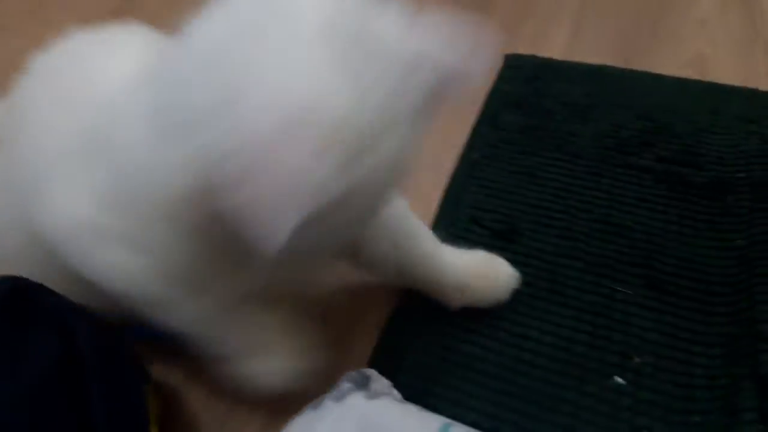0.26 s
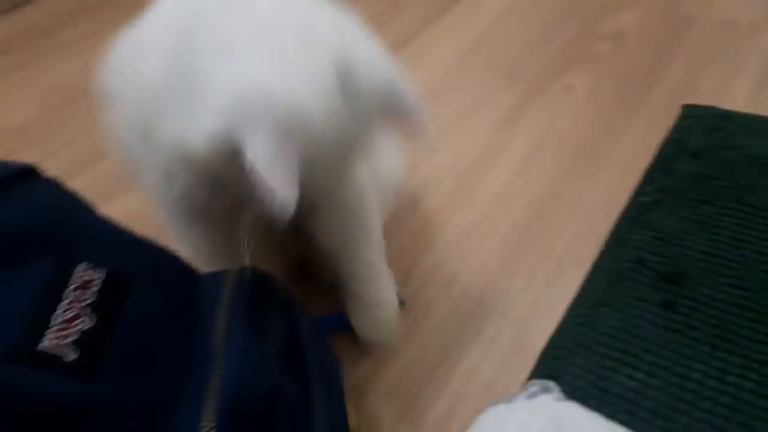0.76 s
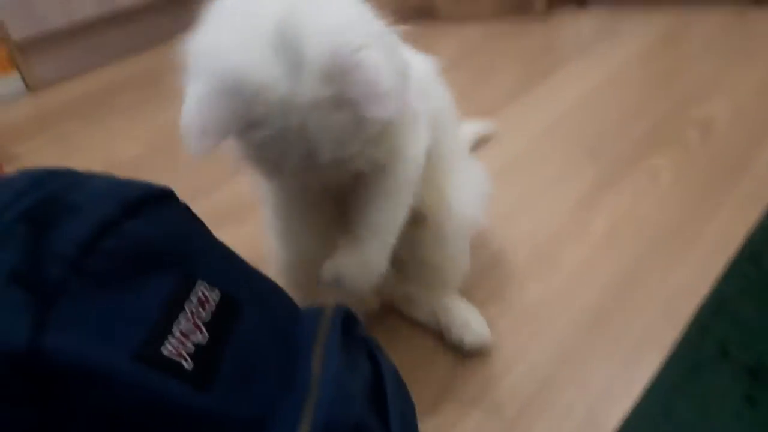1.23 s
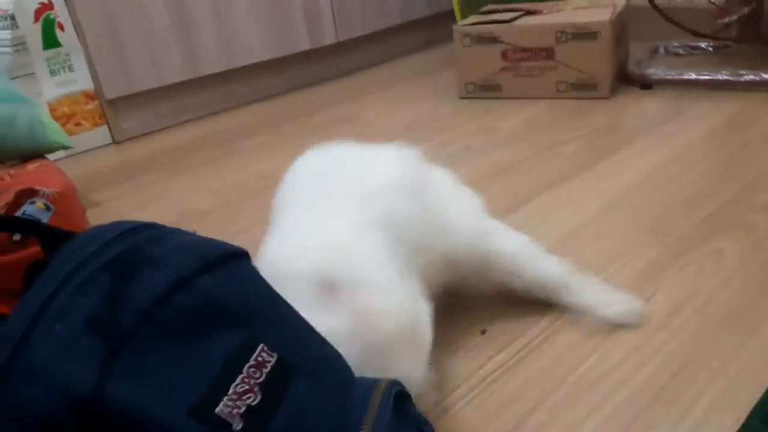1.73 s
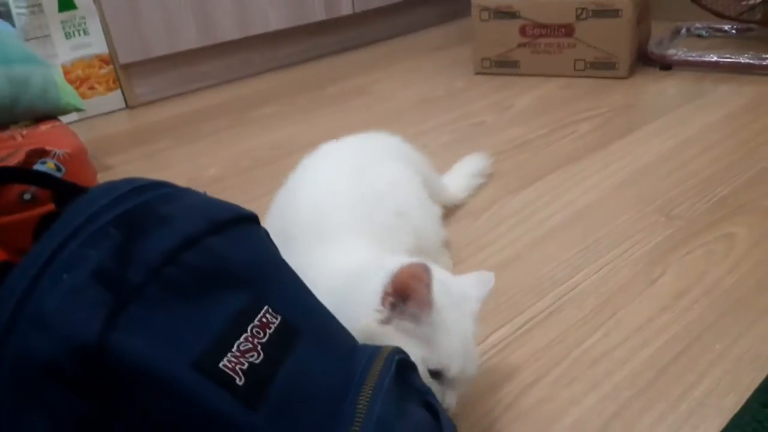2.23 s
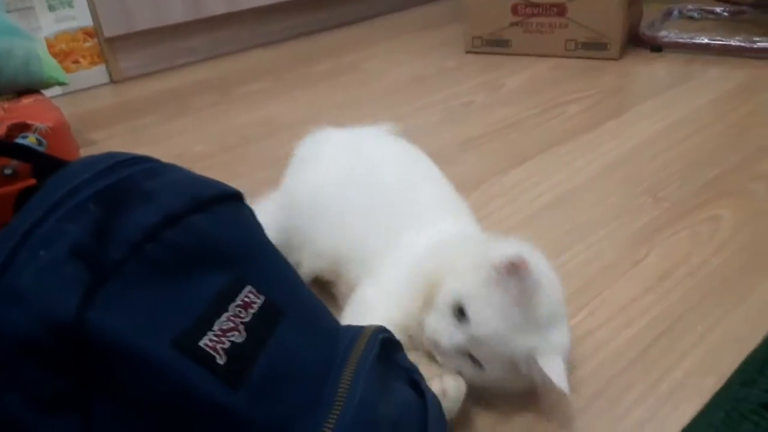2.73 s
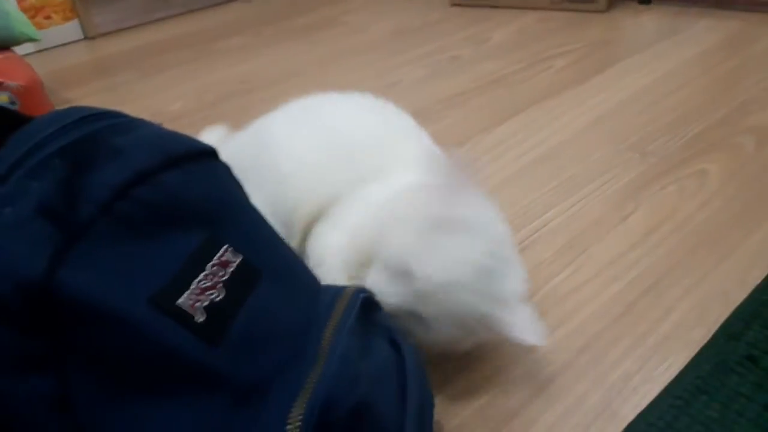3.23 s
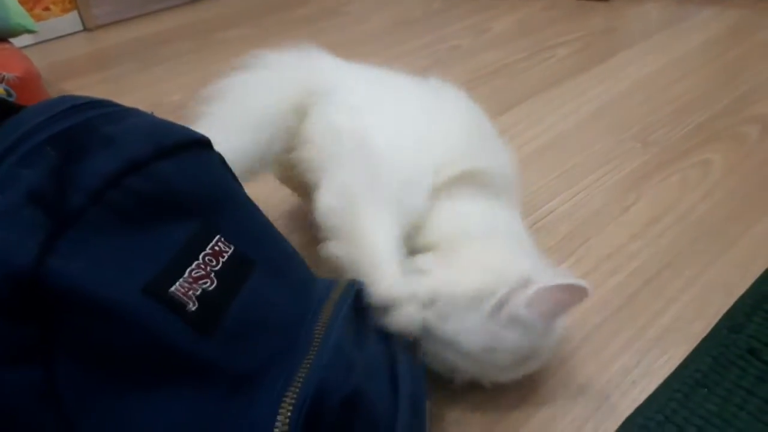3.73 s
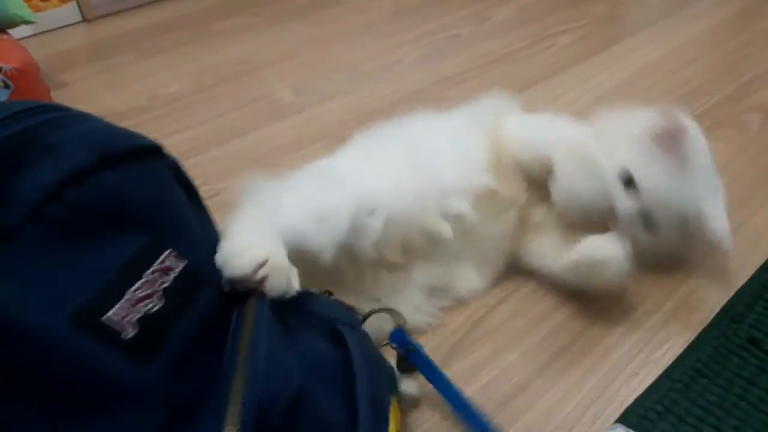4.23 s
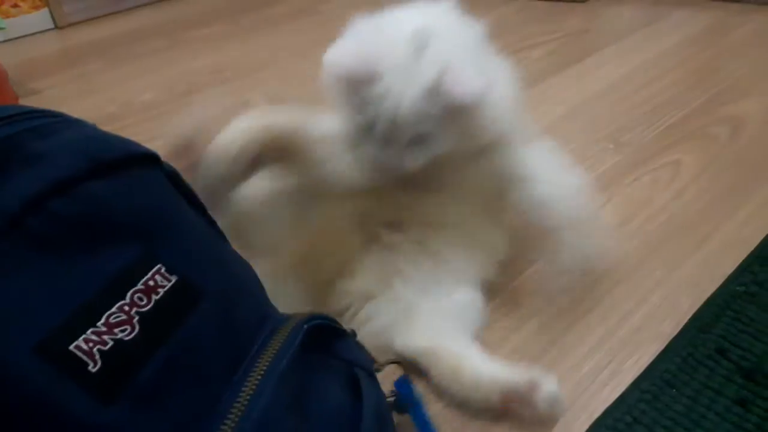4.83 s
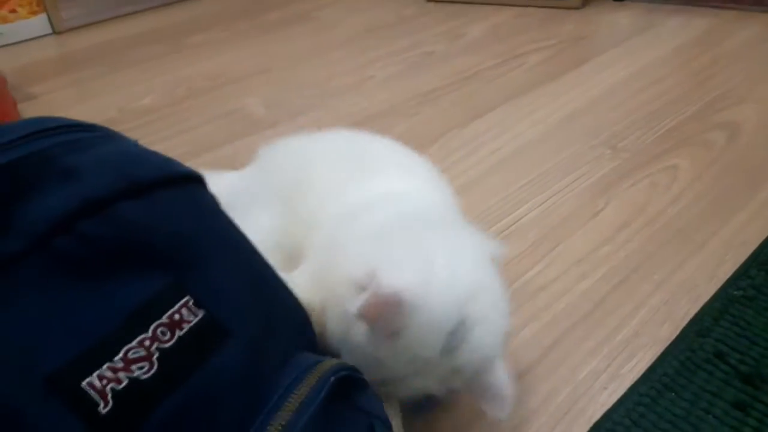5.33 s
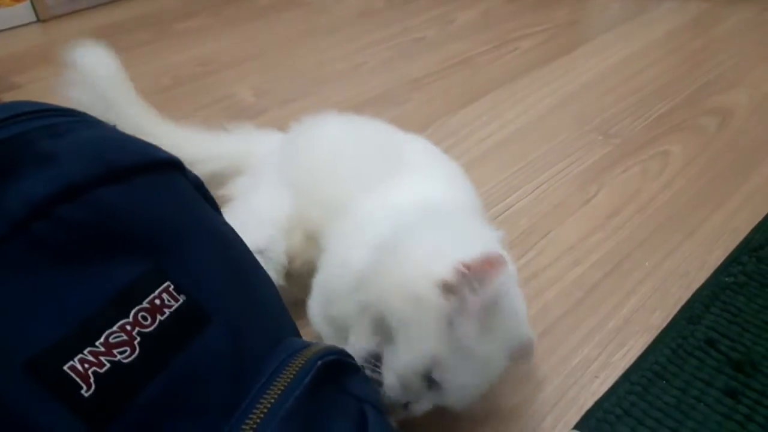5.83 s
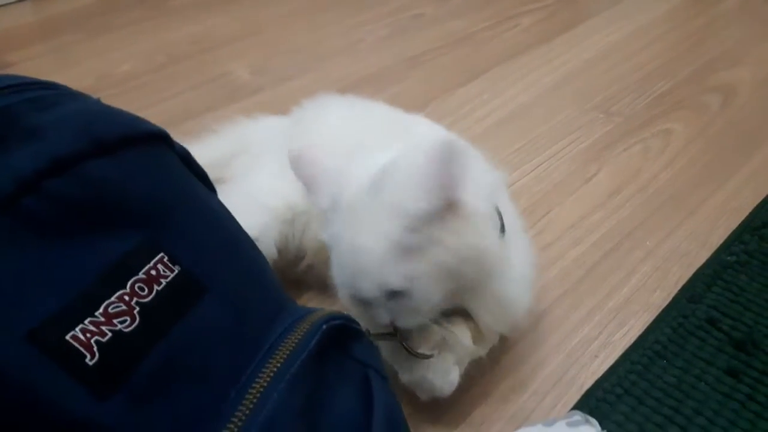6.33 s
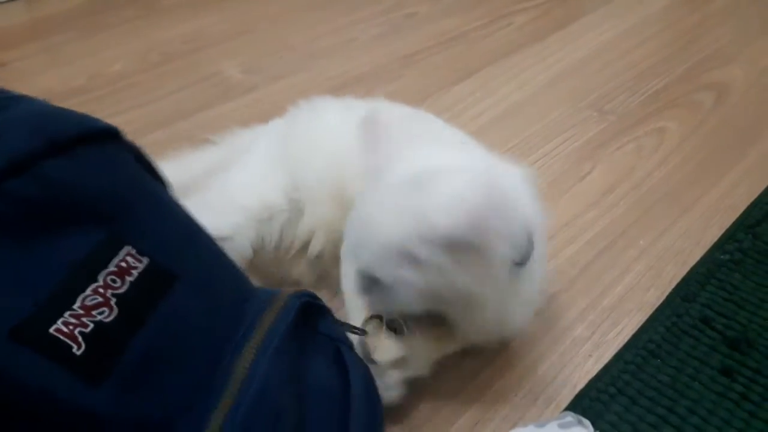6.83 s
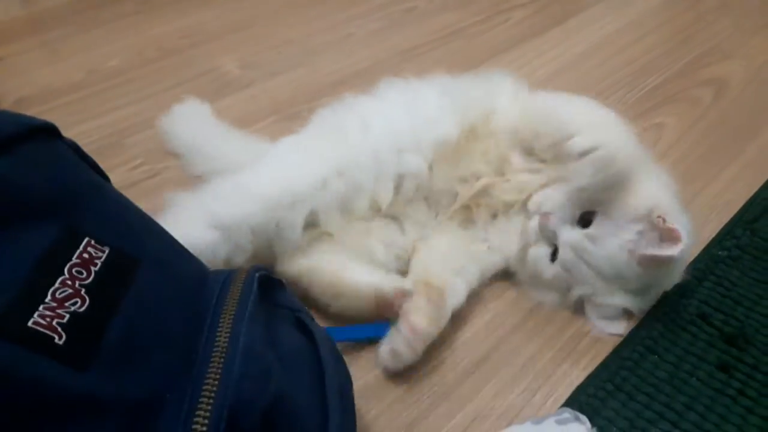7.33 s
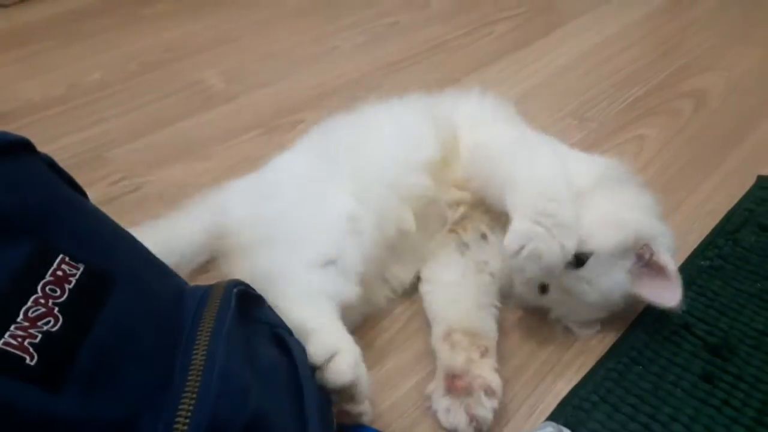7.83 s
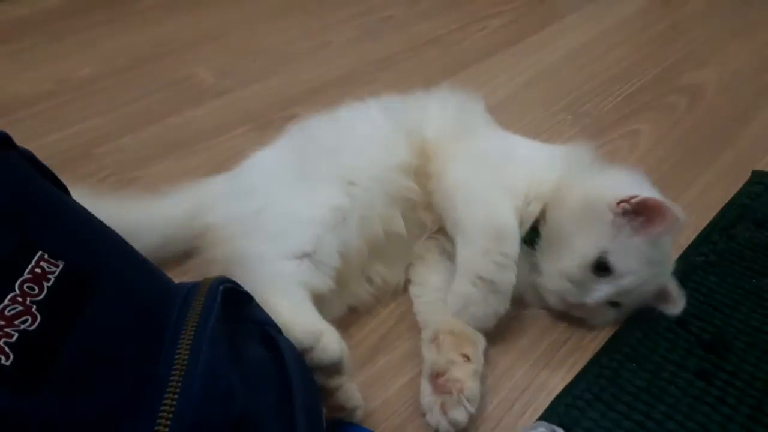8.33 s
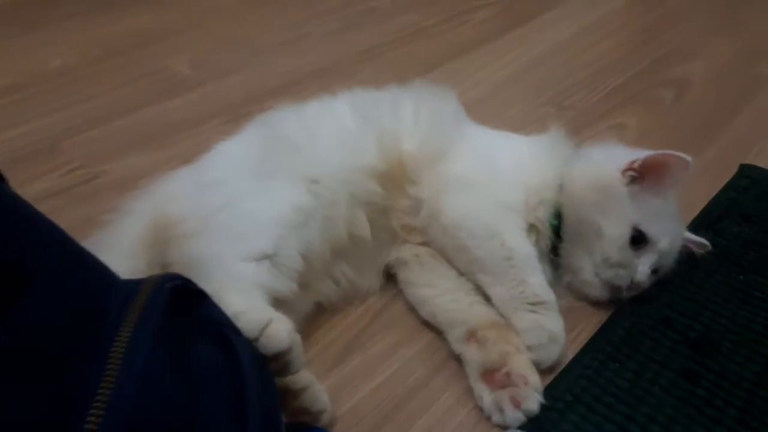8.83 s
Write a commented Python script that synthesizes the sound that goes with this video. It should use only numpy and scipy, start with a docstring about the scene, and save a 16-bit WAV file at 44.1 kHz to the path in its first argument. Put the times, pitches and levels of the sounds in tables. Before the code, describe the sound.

A kitten wrestles a bag strap on a laminate floor, heard close in a small live room. A tiny high collar bell jingles in bursts, with claw ticks, metal tag clinks and nylon rustle. A strap snaps, then a loud double knock hits the boards; later come brighter jingles, scuffs, bounces and thuds. A low appliance hum pulses gently throughout.

```python
"""Kitten wrestling a bag strap

A collar bell jingles in bursts as decaying modes and a zip tag clinks; small clicks of filtered noise give
claws ticking on nylon, muffled bell ticks and the bright edges of a knock. Paws thud and hard things knock
on a laminate floor: short board modes, with noise cracks for the knocks. Fur and nylon rustle as uneven noise
bands, with a room tail of sparse random taps, close to a small microphone.
An appliance hums in steady sines, its motor beating nearly three times a second against the mains tone."""
import sys
import numpy as np
from scipy import signal
from scipy.io import wavfile
from scipy.ndimage import uniform_filter1d

SR = 44100
rng = np.random.default_rng(int(sys.argv[2]) if len(sys.argv) > 2 else 0)


def field_ratio(decibels):
    """Amplitude ratio for a level in dB (20 dB per decade); scalars and array-likes work."""
    return 10 ** (np.asarray(decibels, dtype=float) / 20)


def waveform_to_disk(signal):
    """Save audio, clipped to [-1, 1], as 16-bit WAV at the path in sys.argv[1]."""
    frames = np.transpose(np.atleast_2d(signal))
    scaled = np.clip(frames, -1, 1) * 32767
    samples = np.round(scaled).astype(np.int16)
    wavfile.write(sys.argv[1], SR, samples)


N = 399987  # length in samples

# Ringing modes of the bell's shell. Each row: nominal frequency in Hz, relative level in dB, t60 in seconds.
BELL_MODES = [(4767, 2, 0.045), (4814, -3, 0.05), (6050, -15.5, 0.015), (11460, -3, 0.074),
              (11350, 0.5, 0.08)]
# Upper bell modes against the main ring as the bell turns. Each row: time in seconds, gain in dB.
UPPER_GAIN = [(.75, -9.5), (1.45, -2), (1.53, -5), (1.9, -12.5), (4.86, -1.5), (5.55, -14), (7.04, -2),
              (7.11, -10.5), (7.3, 3), (7.7, -4)]
UPPER_FROM_HZ = SR / 5


def evened(x):
    """Scales to rms 1."""
    return x / np.sqrt(np.mean(x ** 2) + 1e-20)


def read(points, hz):
    """Reads a curve over frequency on a log axis."""
    f, value = np.transpose(points)
    return np.interp(np.log(hz + 1), np.log(f + 1), value)


def add(mix, s, sound):
    """Adds a sound at time s, cut at the end of the mix."""
    part = mix[round(s * SR):][:len(sound)]
    part += sound[:len(part)]


def ring(hz, t60):
    """One mode: a sine that decays by 60 dB in t60 seconds."""
    t = np.arange(round(SR / 8)) / SR
    return field_ratio(-60 * t / t60) * np.sin(2 * np.pi * hz * t)


def band(x, lo_hz, hi_hz, order=2):
    """Causal band-pass."""
    edges = np.clip([lo_hz, hi_hz], 20, .45 * SR)
    return signal.sosfilt(signal.butter(order, edges, "bandpass", fs=SR, output="sos"), x)


def burst(colour, fall_s):
    """A short spit of noise through a minimum-phase filter of the given colour, peak 1."""
    spit = rng.standard_normal(1024) * np.exp(-np.arange(1024) / SR / fall_s)
    log_gain = np.log(field_ratio(read(colour, abs(np.fft.fftfreq(1024, 1 / SR)))))
    minimum_phase = np.exp(np.conj(signal.hilbert(log_gain)))
    out = np.fft.ifft(np.fft.fft(spit) * minimum_phase).real
    return out / abs(out).max()


def grains(per_s, spread_db):
    """Random clicks of either sign, a few of them large."""
    size = field_ratio(spread_db * np.minimum(rng.exponential(1, N), 4))
    present = rng.random(N) < per_s / SR
    return size * present * rng.choice([-1, 1], N)


def bell():
    """Each strike rings the shell's modes in its own mix and ticks; the loose pellet rebounds unevenly after it."""
    # Pellet strikes. Each row: time in seconds, level in dB.
    strikes = [(.725, -47), (.7334, -47), (.748, -44), (.7784, -54), (.798, -39.5), (.885, -50),
               (.9011, -46), (.9301, -45), (1.07, -43), (1.1027, -48), (1.1635, -36), (1.2603, -44),
               (1.2788, -36.5), (1.3696, -35.5), (1.4135, -43), (1.4654, -42), (1.4878, -42.5),
               (1.527, -44), (1.5681, -43), (1.5938, -38.5), (1.9084, -30), (2.5855, -44.5), (2.645, -40),
               (2.7916, -31), (3.3004, -42), (4.8431, -54), (4.859, -42), (5.0032, -40.5), (5.0798, -25.5),
               (5.297, -42), (5.3438, -33.5), (5.5482, -42), (5.7904, -37.5), (5.9253, -38), (5.95, -47),
               (5.993, -48), (6.2981, -47), (6.4615, -49), (7.0426, -33.5), (7.1074, -26), (7.2956, -41)]
    out = np.zeros(N)
    draws = rng.random((len(strikes), 4, 3 + len(BELL_MODES)))  # a strike and three rebounds
    for (s, db), hits in zip(strikes, draws):
        upper_db = np.interp(s, *np.transpose(UPPER_GAIN))
        for k, (wait, weak, muffle, *mix) in enumerate(hits):
            late = .009 * (k - .9 * wait) * (k > 0)  # seconds after the strike
            size_db = db - (k > 0) * (15 * weak + 170 * late)
            pull = 1 + .02 * (muffle - .5)  # fur and pellet pull the pitch about
            for (hz, mode_db, t60), share in zip(BELL_MODES, mix):
                tone_db = size_db - 4.5 + mode_db - 7.5 * share + upper_db * (hz > UPPER_FROM_HZ)
                add(out, s + late, field_ratio(tone_db) * ring(hz * pull, t60))
            spit = rng.standard_normal(512) * np.exp(-np.arange(512) / SR / 0.0011)
            add(out, s + late, field_ratio(size_db + 3.0) * band(spit, 4500, 6700, order=3))
    return out


def rattle():
    """The rolling pellet grazes the shell densely and unevenly; each spell swells and dies away."""
    # Spells of rolling round the shell. Each row: start in seconds, length in seconds, relative level in dB.
    rolls = [(1.82, .16, -52), (2.976, 0.56, -69.5), (4.1, 0.055, -58), (4.239, 0.056, -56.5),
             (4.377, 0.16, -63), (4.615, 0.24, -60.5), (4.83, 0.12, -57), (5.26, .08, -46.5),
             (5.551, 0.2, -53.5), (6.166, 0.097, -66), (6.977, 0.063, -56.5), (7.091, 0.093, -36.5),
             (7.2, 0.17, -62), (7.69, 0.036, -67), (7.847, 0.068, -57)]
    t = np.arange(N) / SR
    swell = np.zeros(N)
    for s, length, db in rolls:
        progress = np.clip((t - s) / length, 0, 1)
        swell += field_ratio(db) * np.sin(np.pi * progress ** 0.55)  # rises faster than it falls
    grazes = swell * evened(grains(300, 5.7))
    upper = field_ratio(np.interp(t, *np.transpose(UPPER_GAIN)))
    out = np.zeros(N)
    for hz, db, t60 in BELL_MODES:
        drive = grazes * (upper if hz > UPPER_FROM_HZ else 1)
        out += signal.oaconvolve(drive, field_ratio(db) * ring(hz, t60))[:N]
    return field_ratio(-24.5) * out


def broad_click(hz):
    """A very short broad click, humped around its own centre."""
    wide = 1 + hz / 9000  # low clicks are narrower
    hump = [(hz / wide ** 3, -35), (hz / wide, -10), (hz, 0), (hz * wide, -10), (hz * wide ** 3, -35)]
    return burst(hump, .0007)


def small_clicks(rustle):
    """Claw catches, muffled bell ticks and a knock's bright edges; random ones come louder with the rustle."""
    # Small clicks: claw catches, muffled bell ticks and the bright edges of a knock.
    # Each row: time in seconds, level in dB, centre in Hz.
    ticks = [(0.6542, -48, 5760), (.8722, -52, 5840), (1.3417, -28, 9000), (0.9806, -33, 11100),
             (1.1447, -19.5, 12400), (1.17, -31, 9750), (1.3706, -25.5, 9100), (1.393, -36, 7500),
             (1.474, -48, 9000), (1.4953, -36, 8100), (1.866, -23.5, 7550), (2.535, -37.5, 10700),
             (2.8504, -29, 10200), (2.864, -19, 13000), (2.8696, -16, 4170), (2.887, -23, 13000),
             (3.3688, -26, 6940), (3.953, -40, 6980), (3.967, -40, 12100), (4.0866, -31, 6750),
             (4.146, -32, 9000), (4.182, -33, 14000), (4.228, -26.5, 12100), (4.24, -29, 12000),
             (4.278, -33, 7000), (4.33, -34.5, 2930), (4.6176, -34.5, 7500), (4.9402, -36.5, 12700),
             (5.0246, -31, 9100), (5.032, -25.5, 11000), (5.143, -27.5, 3200), (5.165, -40, 3370),
             (5.7132, -36, 9330), (6.213, -37.5, 4150), (7.221, -30.5, 4110), (7.253, -20.5, 12600),
             (7.325, -33, 3830)]
    out = np.zeros(N)
    for s, db, hz in ticks:
        add(out, s, field_ratio(db) * broad_click(hz))
    scattered = sum(signal.oaconvolve(grains(14, 3.2), broad_click(hz))[:N] for hz in [5920, 9000, 12500])
    rustle_above = np.maximum(rustle - field_ratio(-71.5), 0)  # faint rustle brings no random clicks
    return out + field_ratio(13) * rustle_above * scattered


def tag():
    """A small metal zip tag; each clink wakes its modes differently."""
    # Modes of the tag. Each row: nominal frequency in Hz, t60 in seconds.
    modes = [(5740, 0.036), (7180, 0.016), (9580, 0.024), (10200, 0.03), (13170, 0.044), (13420, .035)]
    # Clinks. Each row: time in seconds, level in dB, gain of the 5-7 kHz modes in dB, of the 10 kHz modes in dB.
    clinks = [(1.07, -58, -12, 6), (1.2244, -26.5, -12, -31), (1.2884, -29, -7.5, -7),
              (2.757, -41, -4.5, -18.5), (4.3968, -54.5, -18, 11), (7.22, -34, -9, -8)]
    out = np.zeros(N)
    for s, db, low_db, mid_db in clinks:
        mix_db = [low_db, low_db, mid_db - 6.5, mid_db, -3, -5]
        for (hz, t60), mode_db in zip(modes, mix_db):
            add(out, s, field_ratio(db + mode_db) * ring(hz * rng.uniform(1.0, 1.005), t60))
    return out


def knocks():
    """A few cycles of the boards plus a crack; returns the direct sound and what reaches the room."""
    # Knocks and bounces. Each row: time in seconds, level in dB, relative crack in dB, send to the room in dB.
    hits = [(1.3182, -10, -18, -4), (2.8634, -2, 1.5, -5), (2.875, -4, -1.5, -2.5), (5.182, -19, -2, -3.5),
            (5.375, -10.5, 0, -1), (5.42, -21, -7.5, 7), (7.414, -10.5, 1, -3.5), (7.572, -11, -1, -4),
            (7.589, -12, -8, -3.5)]
    # Colour of the crack. Each row: frequency in Hz, gain in dB.
    crack_colour = [(900, -8.5), (2500, 1), (4600, -1.5), (5500, -19.5), (8500, -28), (16000, -45)]
    # Main modes of the floor boards. Each row: frequency in Hz, relative level in dB, t60 in seconds.
    boards = [(515, 0, 0.012), (783, -1, 0.01)]
    # Higher modes of the boards. Each row: frequency in Hz, relative level in dB.
    panel_modes = [(1290, -1), (2200, -4.5), (3030, -4.5), (3540, -3), (4150, -1)]
    near, far = np.zeros((2, N))
    body = sum(field_ratio(db) * ring(hz, t60) for hz, db, t60 in boards)
    body = band(body, 440, 5000, order=3)  # a small hard contact moves little air in the bass
    higher = sum(field_ratio(db) * ring(hz, .012) for hz, db in panel_modes)
    for s, db, crack_db, room_db in hits:
        panel = field_ratio(crack_db - 12.5) * higher
        add(near, s, -field_ratio(db) * (body + panel))
        add(near, s, field_ratio(db + crack_db - 5.0) * burst(crack_colour, 0.0029))
        add(far, s, field_ratio(db + room_db) * (body + .5 * panel))
        add(far, s, field_ratio(db + crack_db + room_db + 6.0) * burst(crack_colour, .00003))
    return near, far


def strap_snap():
    """The strap snaps free in one noise burst; returns the direct sound and a sharper one for the room."""
    # Colour of the snap. Each row: frequency in Hz, gain in dB.
    colour = [(600, -7.5), (3500, -4.5), (9000, -6.5), (16000, -4.5)]
    s, db = 2.0108, -13
    near, far = np.zeros((2, N))
    add(near, s, field_ratio(db) * burst(colour, 0.0024))
    add(far, s, field_ratio(db + 9.0) * burst(colour, .00003))
    return near, far


def thuds():
    """A padded blow of paw or body: a few rounded cycles and no crack."""
    # Thuds. Each row: time in seconds, level in dB, frequency in Hz.
    blows = [(1.429, -32, 600), (1.444, -23.5, 515), (1.652, -36, 500), (1.829, -33, 506),
             (1.899, -27.5, 550), (4.188, -35.5, 300), (4.999, -35, 245), (1.7, -22.5, 500),
             (4.284, -33.5, 470), (4.33, -31, 264), (5.252, -29, 386), (5.563, -37, 1240),
             (7.097, -34, 465)]
    out = np.zeros(N)
    for s, db, hz in blows:
        cycles = ring(hz, 7.3 / hz)
        cycles *= 1 - np.exp(-np.arange(len(cycles)) / SR * hz)  # the pad softens the start
        add(out, s, -field_ratio(db) * cycles / abs(cycles).max())
    return out


def motion():
    """Gains over time of the drag on the boards, the fur and the nylon: wrestling effort plus scuffs."""
    # How hard the kitten wrestles. Each row: time in seconds, rustle level in dB.
    effort = [(.15, -76), (.5, -70), (.9, -80), (1.1, -57), (1.5, -69), (1.78, -59.5), (2.02, -81.5),
              (2.5, -70.5), (2.78, -62), (2.95, -72), (3.8, -78), (4.0, -61), (4.45, -62), (4.56, -67),
              (4.8, -62.5), (4.99, -74), (5.45, -58), (5.9, -76.5), (6.76, -78.5), (6.95, -60), (7.35, -71),
              (7.6, -81), (7.9, -70.5)]
    # Single scuffs. Each row: start in seconds, hold in seconds, level on the boards in dB, rustle level in dB,
    # share of crisp nylon against soft fur from 0 to 1.
    scuffs = [(1.077, 0.3, -58, -52.5, 1), (1.453, 0.05, -49.5, -53, 0.63), (1.779, 0.087, -46.5, -48, 0.1),
              (3.15, 0.11, -60, -85.5, 0.2), (4.154, 0.099, -50.5, -55, 0.7), (4.273, .12, -53, -60.5, 0.8),
              (4.976, 0.24, -54.5, -64.5, 0.74), (6.182, 0.068, -67.5, -68.5, 0.43),
              (6.836, 0.17, -53.5, -69, 0.5), (7.184, 0.093, -55, -57.5, 1),
              (7.438, 0.025, -49.5, -55, 0.9)]
    effort_crisp = 0.38  # nylon share of the effort
    rise_s, fall_db_per_s = .035, 146
    t = np.arange(N) / SR
    effort_db = np.interp(t, *np.transpose(effort), left=-200, right=-200)
    drag = field_ratio(-57 + 1.04 * (effort_db + 58))  # the drag grows slightly faster than the rustle
    rustle = field_ratio(effort_db)
    power = np.array([drag, (1 - effort_crisp) * rustle, effort_crisp * rustle]) ** 2
    for s, hold, boards_db, rustle_db, crisp in scuffs:
        rise = np.clip((t - s) / rise_s, 0, 1)
        fall = field_ratio(-fall_db_per_s * np.maximum(t - s - rise_s - hold, 0))
        crisp = np.clip(crisp, 0, 1)
        gains = [field_ratio(boards_db), (1 - crisp) * field_ratio(rustle_db), crisp * field_ratio(rustle_db)]
        power += np.outer(gains, rise * fall) ** 2
    return np.sqrt(power)


def rubbing(dull, soft, crisp):
    """Dense uneven slips: dull on boards, soft in fur, crackling in nylon; the middle band follows all."""
    grip = field_ratio(3 * evened(uniform_filter1d(rng.standard_normal((4, N)), size=500)))  # stick and release
    snags = 2 * grains(130, 7)  # single threads let go
    boards = band(rng.standard_normal(N) + grains(150, 8), 420, 800)
    paws = band(rng.standard_normal(N) + 2.8 * grains(200, 6.3), 390, 4770)
    fur = band(rng.standard_normal(N) + .6 * snags, 3600, 8500)
    nylon = band(rng.standard_normal(N) + snags, 9000, 17000)
    middle = field_ratio(-5) * np.sqrt(dull * (soft + crisp))
    gains = [dull, middle, soft, field_ratio(0.5) * crisp]
    return sum(g * w * evened(x) for g, w, x in zip(gains, grip, [boards, paws, fur, nylon]))


def room(x, tail_count=3):
    """Sparse random taps dying by band; tails take turns so like hits differ; left and right nearly alike."""
    # Decay of the room. Each row: frequency in Hz, t60 in seconds.
    decay = [(250, 0.16), (1740, .28), (4590, 0.26), (12000, 0.26)]
    shape = (tail_count, 2, SR // 2)
    taps = rng.standard_normal(shape) * (rng.random(shape) < .3)
    taps[..., :round(.003 * SR)] = 0  # gap before the first reflection
    hz, t, z = signal.stft(taps, SR, nperseg=128)
    tails = signal.istft(z * field_ratio(-60 * t / read(decay, hz)[:, None]), SR, nperseg=128)[1]
    turn = (np.arange(N) // 1500) % tail_count
    wet = np.zeros((2, N))
    for k, tail in enumerate(tails):
        source = (x * (turn == k))[None]
        wet += signal.oaconvolve(source, tail / np.linalg.norm(tail[0]), axes=1)[:, :N]
    mid, side = wet
    return mid + field_ratio(-18.5) * np.outer([1, -1], band(side, 250, 5000, order=1))


def hum():
    """Steady sines of an appliance; the motor's second shaft order beats with the mains tone."""
    # Motor tones. Each row: multiple of the shaft frequency, rms level in dB.
    orders = [(1, -49), (2, -48.5), (3, -64.5)]
    # Mains buzz. Each row: frequency in Hz, rms level in dB.
    mains = [(120.176, -46), (240.35, -66)]
    shaft_hz = 58.693
    t = np.arange(N) / SR
    lines = [(k * shaft_hz, db) for k, db in orders] + mains
    return sum(field_ratio(db) * np.sqrt(2) * np.cos(2 * np.pi * hz * t) for hz, db in lines)


def air():
    """Room tone: shaped noise with slow patches, left and right less alike in the treble."""
    # Colour of the room tone. Each row: frequency in Hz, relative level in dB.
    colour = [(26, -31.5), (45, -14.5), (126, -5), (174, -11.5), (251, -10), (432, -24), (779, -24.5),
              (1240, -36.5), (5840, -55.5), (14500, -45)]
    # Likeness of left and right. Each row: frequency in Hz, correlation from 0 to 1.
    likeness = [(400, 1), (9000, 0.28)]
    frames, hz = N // 512 + 5, np.fft.rfftfreq(2048, 1 / SR)
    a, b, c, d, patches = rng.standard_normal((frames, 1025, 5)).T
    patches = evened(uniform_filter1d(uniform_filter1d(patches, 30, 0), 8, 1))
    same = np.clip(read(likeness, hz), -1, 1)[:, None]
    left = a + 1j * b
    right = same * left + np.sqrt(1 - same ** 2) * (c + 1j * d)
    z = np.array([left, right]) * field_ratio(read(colour, hz)[:, None] + 1.7 * patches)
    return field_ratio(-53) * evened(signal.istft(z, nperseg=2048, noverlap=1536)[1][:, :N])


def scene():
    """The kitten sits almost in front of the microphone, the bag a little to the right."""
    knock_near, knock_far = knocks()
    snap_near, snap_far = strap_snap()
    near, far = knock_near + snap_near, knock_far + snap_far
    dull, soft, crisp = motion()
    # pellet and fur damp the shell by fits
    flutter = field_ratio(3.5 * evened(uniform_filter1d(rng.standard_normal(N), size=160)))
    kitten = evened(flutter) * (bell() + rattle()) + thuds()
    bag = tag() + small_clicks(soft + crisp) + rubbing(dull, soft, crisp)
    kitten_pan = field_ratio(np.array([[-.2], [.2]]))  # left and right, dB
    bag_pan = field_ratio(np.array([[-.6], [.6]]))
    front = (near + kitten) * kitten_pan + bag * bag_pan
    return front + room(far + field_ratio(-4.5) * kitten + field_ratio(-7.5) * bag) + hum() + air()


def band_limit(x):
    """A steep low-pass at the top of the band."""
    return signal.sosfilt(signal.butter(12, 17180, fs=SR, output="sos"), x)


def record(dry):
    """Soft overload, then the microphone's bass cut and a band limit."""
    overloaded = np.tanh(dry)
    bass_cut = signal.sosfilt(signal.butter(4, 45, "highpass", fs=SR, output="sos"), overloaded)
    low_pass = signal.firwin(255, 16050, window=("kaiser", 8), fs=SR)
    mix = signal.oaconvolve(bass_cut, low_pass[None], "same")
    return band_limit(mix)


dry = scene()
out = record(dry)
waveform_to_disk(out)
```